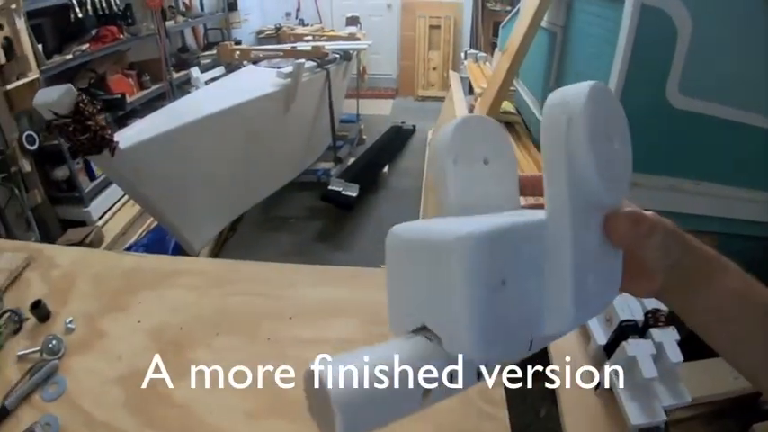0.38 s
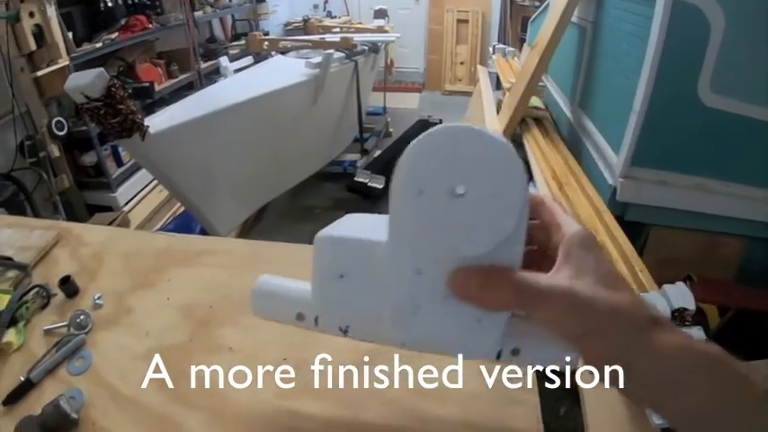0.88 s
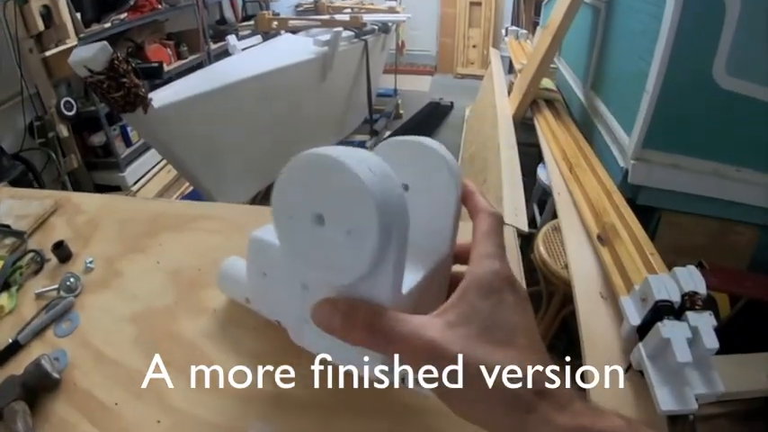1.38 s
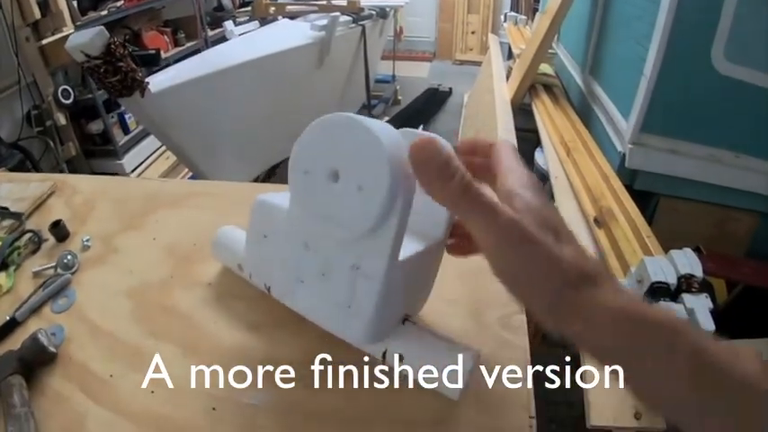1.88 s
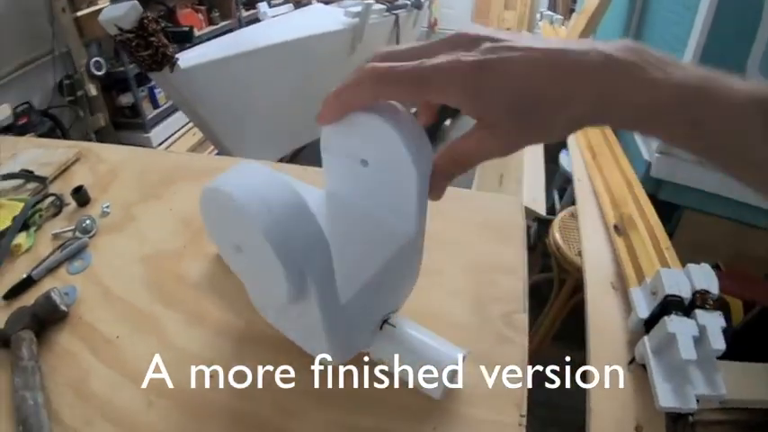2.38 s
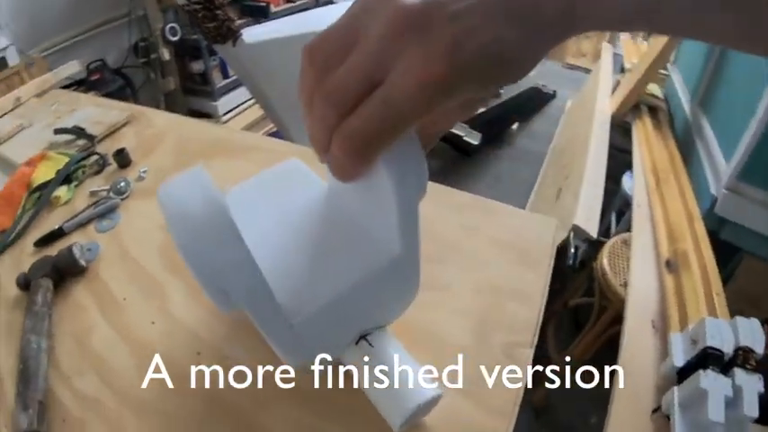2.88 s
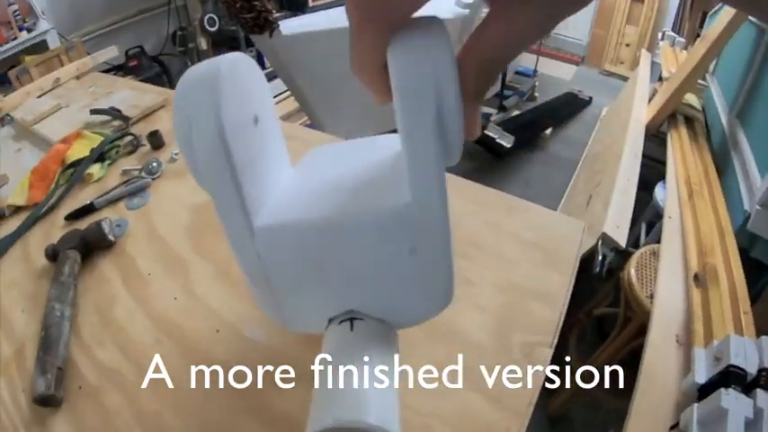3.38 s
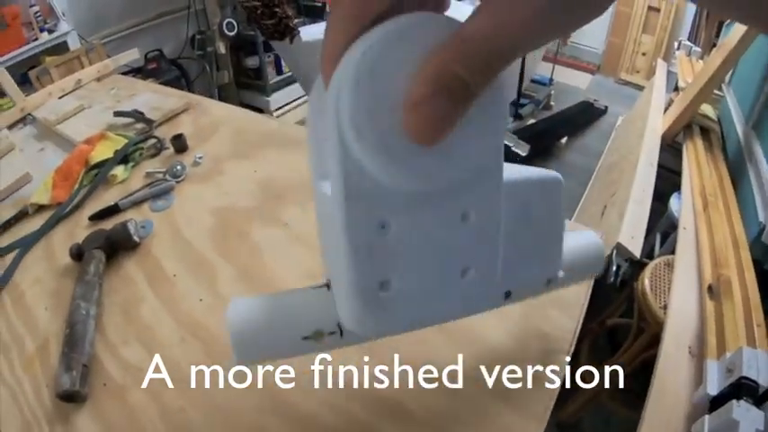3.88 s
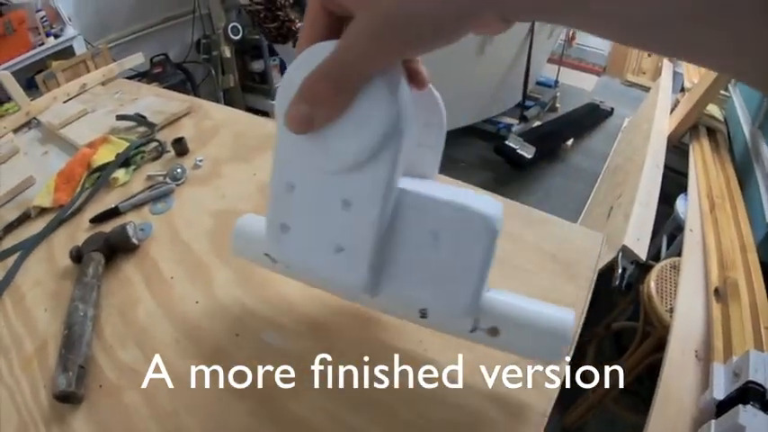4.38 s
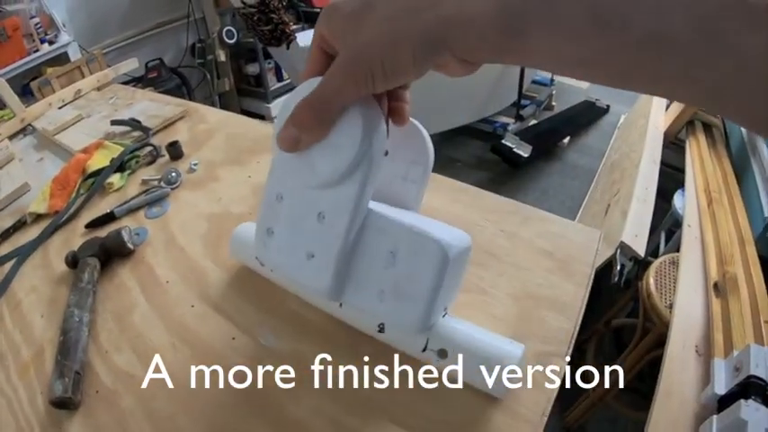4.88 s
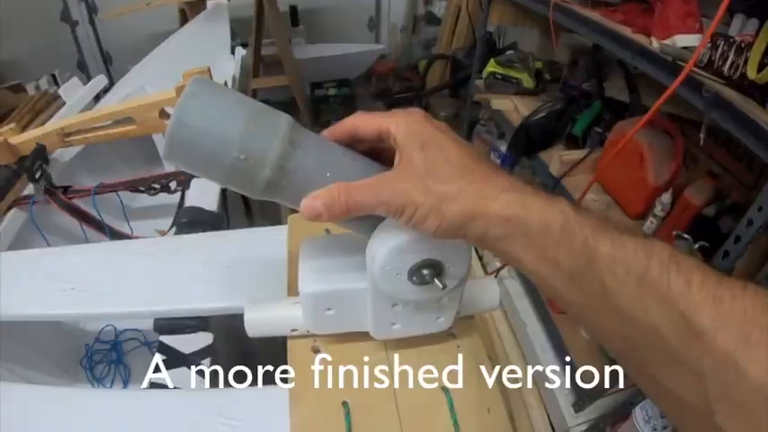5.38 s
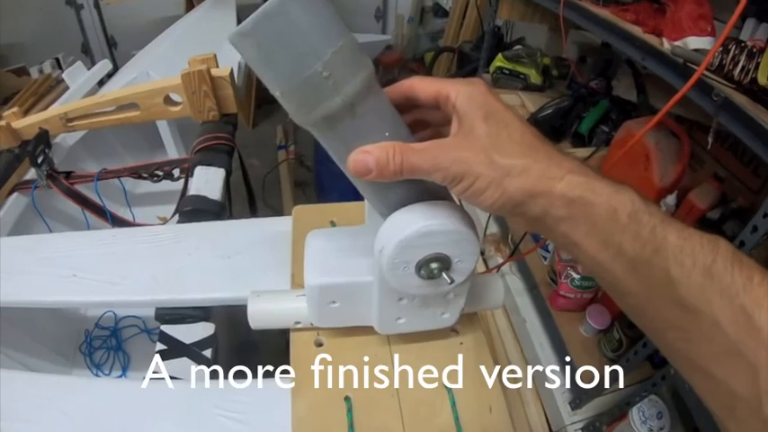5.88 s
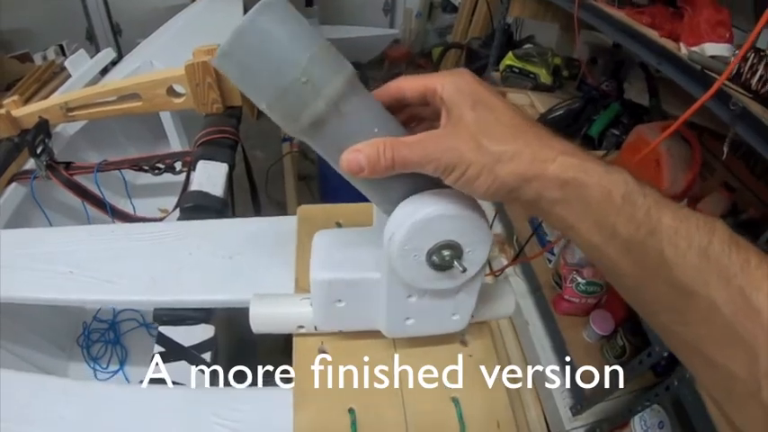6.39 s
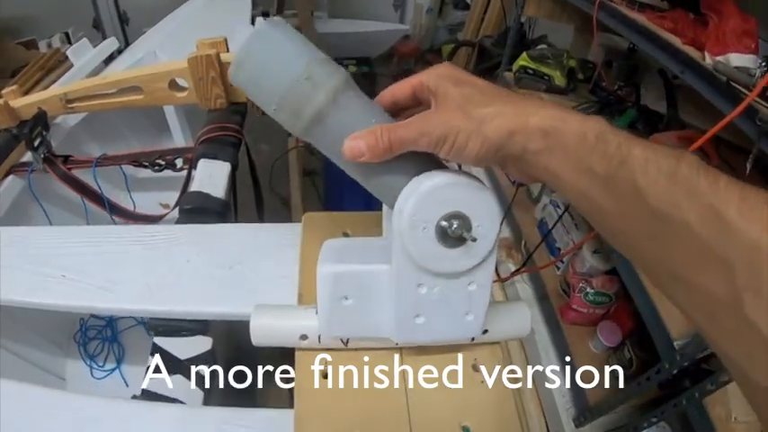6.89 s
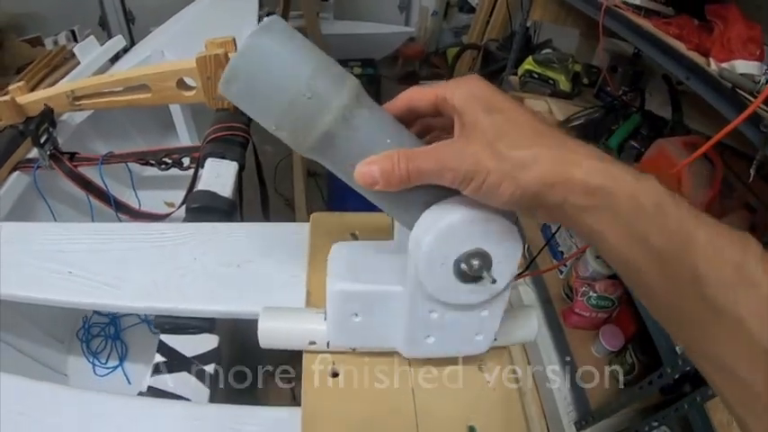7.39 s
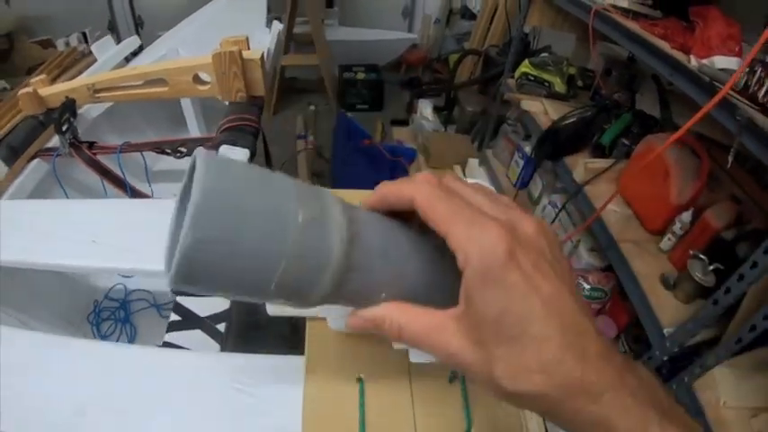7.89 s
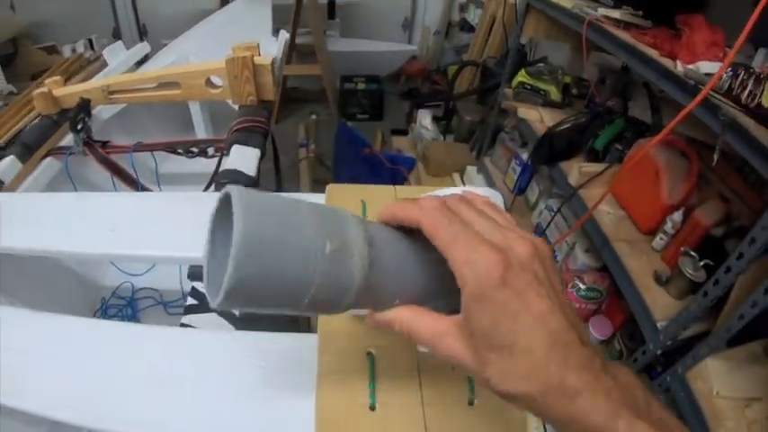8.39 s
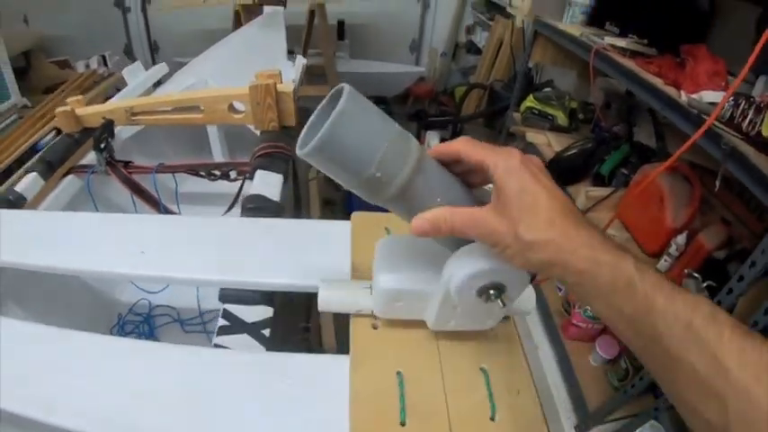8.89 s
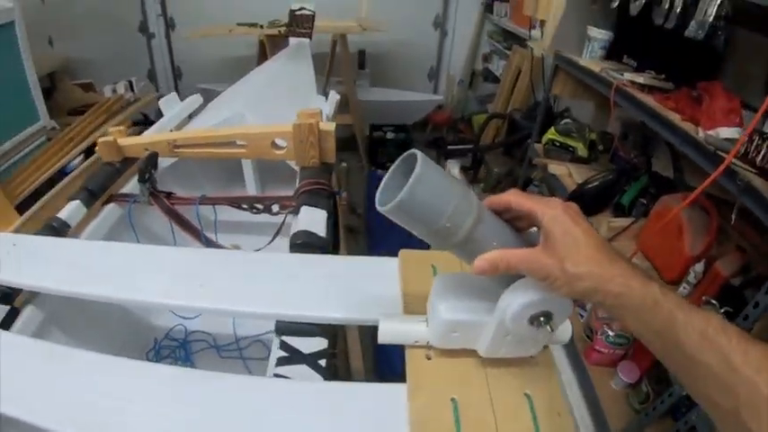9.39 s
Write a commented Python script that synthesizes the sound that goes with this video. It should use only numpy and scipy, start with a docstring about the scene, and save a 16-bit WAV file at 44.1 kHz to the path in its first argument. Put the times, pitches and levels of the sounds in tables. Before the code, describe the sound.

A hollow plastic bracket thuds onto plywood amid dry finger rubbing, then a plastic pipe knocks, creaks and scrapes on its pivot over faint garage hum.

```python
"""Lamps hum in a garage over low rumble while fingers rub a hollow plastic bracket and set it down on plywood.
After a fade at 5.2 s a plastic pipe swings on its pivot, knocking, creaking and scraping, with low thumps;
its first swings are heard in mono, then the stereo image widens steadily until a last short fade.
Blows and rubbing excite banks of damped modes; hum is a sum of sines; air, rumble and hiss are filtered noise.
Levels in the tables precede the common 6 dB reduction in record()."""
import sys
import numpy as np
from scipy import signal
from scipy.fft import rfft, irfft
from scipy.io import wavfile

SR = 44100
rng = np.random.default_rng(int(sys.argv[2]) if len(sys.argv) > 2 else 0)


def unload_audio(sound):
    """Save the sound as a 16-bit wav file, at the path given as the first command line argument."""
    columns = np.transpose(np.atleast_2d(sound))
    # keep every value between -1 and 1, then stretch to whole-number steps
    steps = np.round(np.clip(columns, -1, 1) * 32767)
    wavfile.write(sys.argv[1], SR, steps.astype(np.int16))


def nominal_scale(level):
    """Amplitude ratio for a level in decibels (scalar or array-like)."""
    x = np.asarray(level, float) / 20
    return 10 ** x


N = 419832
TIME = np.arange(N) / SR
OPPOSITE = np.array([[1], [-1]])   # signs of a side signal in the left and right ports

# Bracket meets bench. Each row: start in seconds, levels of thud, clack and snap in dB,
# best-struck pitch in Hz.
BRACKET_LANDINGS = [(1.294, -24.5, -36.5, -57, 260), (1.314, -29, -65, -74, 263),
                    (1.331, -31, -53.5, -64, 250), (1.456, -45, -63, -74, 237),
                    (1.603, -17.5, -33, -79, 334), (1.611, -30, -42.5, -70, 340),
                    (1.634, -33, -46, -59, 210), (1.797, -51, -62, -50, 256), (2.079, -46, -74, -59, 194),
                    (2.431, -43.5, -72, -52, 278), (2.534, -48.5, -82, -47, 257),
                    (2.584, -55, -69, -57, 232), (2.654, -54, -90, -70, 270), (2.845, -54.5, -76, -62, 310),
                    (3.43, -30.5, -47, -37, 200), (3.458, -50, -44.5, -36, 292),
                    (3.473, -35.5, -80, -53, 238), (4.671, -22.5, -36, -38.5, 295),
                    (4.685, -30.5, -60, -56, 300), (4.707, -32.5, -55, -58, 246),
                    (4.743, -49, -59, -48, 158), (4.767, -32.5, -56.5, -52, 164.5),
                    (4.844, -37, -72, -65, 167), (4.933, -59.5, -61, -68, 156), (5.043, -67, -86, -67, 249)]
# Modes of the plywood top. Each row: frequency in Hz, level in dB, relative ring time.
PLYWOOD_MODES = [(63.7, 1.5, 0.42), (95, 5.5, 0.34), (147.9, -4, 1), (178, -1.5, 0.93), (200.15, 1, 0.88),
                 (230.3, -15, 0.87), (254, 0.5, 0.52), (278, -16.5, 0.36), (309.7, -1, 0.7),
                 (336.6, -12.5, 0.47), (368, -11.5, 0.36), (390, -6, 0.37), (416, -17, 0.23),
                 (452.6, -13, 0.41)]
# Resonances of the shell under the fingers. Each row: frequency in Hz, width in Hz, level in dB.
RUBBED_SHELL_MODES = [(756, 120, 11.5), (1400, 97, 8), (2093, 65, 0), (2800, 270, -12), (3726, 32, -19.5),
                      (4090, 62, -11), (5160, 150, -11.5), (5750, 150, -11.5), (6230, 500, -2.5)]
# Pipe strikes pivot and bracket. Each row: start in seconds, level in dB,
# hardness (0 hollow, 1 middle, 2 clack, 3 bright).
PIPE_KNOCKS = [(5.35, -68, .02), (5.395, -42, 0.049), (5.41, -53, 0.25), (5.435, -59.5, 1.45),
               (5.437, -36.5, 0.24), (5.446, -43.5, 0.022), (5.476, -49.5, 0.061), (5.573, -40.5, 0.29),
               (5.603, -63, 0.98), (5.621, -44.5, .02), (5.646, -42.5, 1.6), (5.652, -43, 1.7),
               (5.657, -31, 1.18), (5.661, -36.5, 1.43), (5.669, -32.5, 1.3), (5.686, -48, 1.5),
               (5.733, -53, 1.97), (5.78, -46.5, .02), (5.794, -50.5, 0.3), (5.855, -36.5, 0.017),
               (5.9, -65, 0.038), (5.929, -47.5, 0.052), (5.969, -60, 0.6), (6.003, -54, 0.26),
               (6.173, -47.5, 1.52), (6.183, -49, 2.5), (6.229, -52.5, 1.45), (6.26, -49.5, 0.015),
               (6.285, -58.5, 0.015), (6.302, -70, 0.15), (6.33, -63.5, .02), (6.389, -58, .1),
               (6.413, -60, 0.03), (6.44, -61, .02), (6.462, -59.5, .05), (6.478, -59, 0.86),
               (6.498, -61, 0.36), (6.569, -59, .9), (6.598, -53, 0.98), (6.608, -58, 0.62),
               (6.634, -56, 0.95), (7.643, -40, 0.24), (7.675, -39.5, 0.12), (7.685, -45, 0.12),
               (7.694, -36, 0.25), (7.704, -53, 0.12), (7.734, -54, 0.64), (7.788, -57, 0.022),
               (7.926, -30.5, 1.27), (7.926, -37, 2.4), (7.951, -27, 1.3), (7.952, -16.5, 2.59),
               (7.957, -29, 1.36), (7.958, -20, 2.49), (7.97, -31, 2.2), (7.982, -46, 3),
               (7.999, -23, 2.38), (8.001, -32.5, 1.17), (8.012, -41, 2.14), (8.014, -38, 1.23),
               (8.019, -40.5, 1.7), (8.807, -54, 0.02), (8.814, -52, 1.05), (8.82, -65, .03),
               (8.84, -57, 0.9), (8.913, -67, 0.93)]
# Correlation of the ports. Each row: frequency in Hz, likeness (1 equal, -1 opposite).
PORT_LIKENESS = [(60, -0.18), (220, 1), (450, 0.35), (1200, -0.41), (3000, -0.064)]
# Fades between passages. Each row: silent moment in seconds, fade-out and fade-in in seconds.
FADES = [(5.179, 0.13, 0.14), (9.482, 0.095, 0.036)]


def rms_one(x):
    """Normalization: scale a signal to unit rms."""
    return x / np.sqrt(np.mean(x ** 2) + 1e-20)


def in_time(rows, outside=None):
    """Linear interpolation: the columns of a time curve, sample by sample."""
    s, *columns = np.transpose(rows)
    return [np.interp(TIME, s, c, outside, outside) for c in columns]


def at_hz(points, hz):
    """Logarithmic pitch: a spectrum table is read linearly in the logarithm of frequency."""
    table_hz, value = np.array(points)[:, 0], np.array(points)[:, 1]
    return np.interp(np.log(hz), np.log(table_hz), value)


def cut(x, hz, kind, order=2):
    """Band limitation: a maximally flat (Butterworth) filter."""
    return signal.sosfilt(signal.butter(order, hz, kind, fs=SR, output="sos"), x)


def drift(rate):
    """Slow random modulation: noise through two equal poles at rate (Hz), with unit rms."""
    r = np.exp(-80 * np.pi * rate / SR)   # computed at every 40th sample
    noise = rng.standard_normal(N // 40 + 2002)
    slow = signal.lfilter([1], [1, -2 * r, r * r], noise)[2000:]
    return np.interp(np.arange(N) / 40, np.arange(len(slow)), rms_one(slow))


def ring(clicks, hz, t60):
    """Damped resonance: a unit click starts a decaying sine of height 1; t60 in seconds."""
    r, w = nominal_scale(-60 / (t60 * SR)), 2 * np.pi * hz / SR
    return signal.lfilter([0, np.sin(w)], [1, -2 * r * np.cos(w), r * r], clicks + 1e-18)


def strike(seconds, blow_db, modes, scatter_db, crunch_s, sharpness=2.1):
    """Modal excitation: a short crunch of contacts feeds each mode (Hz, dB, t60 s) near its own pitch."""
    at, n = np.round(seconds * SR).astype(int), np.arange(600)
    out = np.zeros(N)
    luck = scatter_db * rng.standard_normal((len(at), len(modes)))
    crunch = rng.standard_normal((len(at), len(n))) * nominal_scale(-60 * n / (crunch_s * SR))
    crunch *= 1 - np.exp(-6 * (n + 1) / (crunch_s * SR))   # the contact area grows first
    crunch[:, 0] = abs(crunch[:, 0])   # the first contact always pushes the same way
    crunch /= np.sqrt(np.sum(crunch ** 2, axis=1, keepdims=True))
    for k, (hz, level_db, t60) in enumerate(modes):
        at_pitch = abs(crunch @ np.exp(-2j * np.pi * hz * n / SR))   # spectrum of the crunch at this mode
        drive = np.maximum(at_pitch, 0.55)
        r = np.exp(-np.pi * hz / (sharpness * SR))   # sharpness is the Q of the feeding band
        poles = [1, -2 * r * np.cos(2 * np.pi * hz / SR), r * r]
        near = signal.lfilter([(1 - r * r) / 2, 0, (r * r - 1) / 2], poles, crunch)
        strength = nominal_scale(blow_db + level_db + luck[:, k]) / drive
        push = np.zeros(N)
        np.add.at(push, at[:, None] + n, strength[:, None] * near)
        out += ring(push, hz, t60)
    return out


def grains(per_s, spread_db):
    """Stick-slip as a random impulse train: clicks of uneven size and either sign, with unit rms."""
    sizes = nominal_scale(spread_db * np.minimum(rng.exponential(1, N), 4)) * rng.choice([-1, 1], N)
    return rms_one(sizes * (rng.random(N) < per_s / SR))


def coloured(x, spectrum):
    """Linear filtering in the frequency domain: a spectrum table shapes a noise to unit rms."""
    hz = np.fft.rfftfreq(N, 1 / SR) + 1
    return rms_one(irfft(rfft(x) * nominal_scale(at_hz(spectrum, hz)), N))


def puff(seconds, blow_db, t60):
    """Dense modal decay as noise: a burst dies exponentially after every blow."""
    clicks = np.zeros(N)
    clicks[np.round(seconds * SR).astype(int)] = nominal_scale(blow_db)
    envelope = signal.lfilter([1], [1, -nominal_scale(-60 / (t60 * SR))], clicks + 1e-18)
    return envelope * rng.standard_normal(N)


def swells(start, length, rise_db, fall_db, arch_db, *weights_db):
    """Envelopes: each row rises, arches and dies (slopes in dB/s); one sum per set of levels."""
    t = np.arange(0, N + 32, 32) / SR
    late = t - start[:, None]
    after_end = late - length[:, None]
    within = np.clip(2 * late / length[:, None] - 1, -1, 1)
    slopes_db = rise_db * np.minimum(late, 0) - fall_db * np.maximum(after_end, 0)
    shape = nominal_scale(slopes_db - arch_db * within ** 2)
    return [np.interp(TIME, t, nominal_scale(db) @ shape) for db in weights_db]


def likeness_at(hz):
    """Correlation of two receivers: likeness of the ports at a frequency, kept short of its extremes."""
    return np.clip(at_hz(PORT_LIKENESS, hz), -.95, .95)


def room_air():
    """Partly correlated noise: half-octave bands of room air share a mid and differ by a side signal."""
    # Spectrum of the air. Each row: frequency in Hz, level in dB per Hz.
    air_spectrum = [(110, -12.5), (170, 3), (240, 0.5), (330, -17), (500, -17), (850, -16), (1300, -27),
                    (2000, -27), (3500, -38), (6000, -39.5), (9000, -57.5)]
    out = np.zeros((2, N))
    white = rng.standard_normal((2, 2, N))
    edges = 110 * 2 ** np.arange(0, 7, .5)
    for k, (low, high) in enumerate(zip(edges, edges[1:])):
        mid, side = cut(white[k % 2], [low, high], "band")
        centre = np.sqrt(low * high)
        alike = likeness_at(centre)
        gain = nominal_scale(at_hz(air_spectrum, centre) + 1.0 * drift(11))
        out += gain * (mid + np.sqrt((1 - alike) / (1 + alike)) * side * OPPOSITE)
    return out * nominal_scale(-73.5) / np.std(out.mean(axis=0))


def lamp_hum():
    """Harmonic series: lamps sound wavering multiples of the mains, out of phase between the ports."""
    # Each row: multiple of the mains, level in dB before and after the first fade.
    hum_lines = [(3, -84, -85), (4, -70, -74), (5, -91, -85), (6, -80, -83), (7, -100, -89.5),
                 (8, -83.5, -84), (10, -86.5, -90), (12, -92.5, -86.5), (14, -87, -88), (16, -89, -100),
                 (18, -101, -104), (20, -99, -104), (22, -104, -95.5), (24, -99, -106), (28, -99, -103),
                 (30, -106, -97)]
    mains_hz = 59.95
    out = np.zeros((2, N))
    for multiple, first_db, second_db in hum_lines:
        hz = np.round(multiple) * mains_hz
        db = np.where(TIME < FADES[0][0], first_db, second_db)
        turn = 2 * np.pi * (hz * TIME + rng.random())
        lag = np.arccos(likeness_at(hz)) / 2 * OPPOSITE
        # dividing by cos(lag) keeps the level of the mid signal
        out += np.sqrt(2) * nominal_scale(db + 1.3 * drift(17.0)) * np.sin(turn + lag) / np.cos(lag)
    return out


def background():
    """Superposition: room air and lamp hum follow one level curve."""
    # Each row: time in seconds, level in dB.
    level_curve = [(0, 5.5), (5.1, 4), (5.3, 4), (7.5, 7.5), (8.1, 2.5), (8.42, -1.5), (8.55, 4), (9.52, 1)]
    return nominal_scale(in_time(level_curve)[0]) * (room_air() + lamp_hum())


def rumble():
    """Low-frequency noise, partly its own in each port, swells at times and after each bench thud."""
    # Each row: start in seconds, length in seconds, level in dB.
    surges = [(0.212, 0.21, -60.5), (0.7, 0.2, -61), (1.056, 0.025, -61), (2.834, 0.051, -56),
              (4.373, 0.1, -58), (5.225, 0.022, -43.5), (5.31, 0.72, -50.5), (6.1, 0.15, -57),
              (6.424, 0.12, -54.5), (6.67, 0.031, -48.5), (7.055, 0.13, -52), (7.273, 0.62, -54),
              (8.152, 0.042, -66.5), (8.524, 0.42, -61.5), (9.033, 0.24, -64.5)]
    # a thud shakes the microphones for 17 ms, 25 dB below its own level
    shakes = [(s, 0.017, thud_db - 25) for s, thud_db, *_ in BRACKET_LANDINGS]
    s, length, db = np.transpose(surges + shakes)
    level = nominal_scale(-78) + swells(s, length, 255.5, 151.5, 7.5, db)[0]   # steady floor at -78 dB

    def lumpy_noise():
        """Amplitude modulation: slow chance makes the low band uneven."""
        low = cut(cut(rng.standard_normal(N), 38, "low"), 23, "high")
        return rms_one(low * nominal_scale(2.8 * drift(9)))

    mid, side = lumpy_noise(), lumpy_noise()
    return level * (mid + nominal_scale(-9.0) * side * OPPOSITE)


def fingertip_landings():
    """Modal selection: each fingertip excites the shell most near its best-struck pitch."""
    # Each row: start in seconds, level in dB, best-struck pitch in Hz.
    landings = [(0.4973, -59.5, 2250), (0.5191, -57, 2120), (1.8781, -48, 6100), (1.8991, -64, 2600),
                (1.9614, -53, 764), (2.0294, -61, 2200), (2.389, -67, 1500), (2.5296, -50.5, 1440),
                (2.588, -55.5, 1400), (3.098, -57.5, 755), (3.2994, -67, 1480)]
    loss_db_per_octave2 = 20
    s, nail_db, best_hz = np.transpose(landings)
    out = np.zeros(N)
    for hz, wide, db in RUBBED_SHELL_MODES:
        loss_db = loss_db_per_octave2 * np.log2(hz / best_hz) ** 2
        out += strike(s, nail_db - loss_db, [(hz, db, 1.44 / wide)], scatter_db=6.0, crunch_s=0.0024)
    return out


def rub():
    """Stick-slip friction: skin slips in dense grains that excite the shell and press on the board."""
    # Each row: start in seconds, length in seconds, rub level in dB, brightness in dB,
    # shell ring in dB relative to the skin hiss.
    strokes = [(0.512, 0.026, -99.5, 0.5, 30), (0.916, 0.033, -85, -8.5, 16),
               (1.006, 0.021, -76.5, -1.5, 0), (1.068, 0.16, -80, -3, 0), (1.26, 0.18, -76.5, -21, 8),
               (1.432, 0.11, -70, -12, 7.5), (1.617, 0.26, -67, -8, 1.5), (1.881, 0.091, -59.5, -6.5, 2),
               (1.996, 0.083, -58.5, -12.5, 2.5), (2.061, 0.27, -72.5, -4.5, 0.5),
               (2.369, 0.063, -61, -8, 1.5), (2.426, 0.08, -66, -14.5, -0.5), (2.528, 0.034, -68, -4, -0.5),
               (2.562, 0.057, -68, -9, -3), (2.607, 0.062, -60.5, -4.5, 0), (2.68, 0.24, -77.5, -11, 0.5),
               (2.914, 0.25, -61.5, -0.5, -9), (3.177, 0.079, -72, -0.5, 4), (3.294, 0.013, -78, 0, 0),
               (3.428, 0.0085, -75, -30, 20), (3.46, 0.02, -52, -26, -13), (3.727, 0.092, -77.5, -16, -1),
               (4.662, 0.085, -70, -17, -11), (4.756, 0.016, -58.5, -23, -5),
               (4.935, 0.029, -68, -14, -1.5), (5.055, 0.014, -84, -9, 2)]
    # Skin hiss. Each row: frequency in Hz, level in dB per Hz.
    skin_spectrum = [(500, -12), (900, -7.5), (1500, 11.5), (2800, 5), (5000, -11), (7500, -8),
                     (10000, -14), (13000, -18), (15500, -28)]
    press_db = 1   # board relative to the shell ring
    s, length, rub_db, bright_db, ring_db = np.transpose(strokes)
    dull, bright, dull_ring, bright_ring = swells(
        s, length, 610.5, 256, 13,
        rub_db, rub_db + bright_db, rub_db + ring_db, rub_db + ring_db + bright_db)
    slip = grains(3500, spread_db=2.5) * nominal_scale(2.73 * drift(30))
    shell = np.zeros(N)
    for hz, wide, db in RUBBED_SHELL_MODES:   # each peak wavers in level by its own slow chance
        shell += nominal_scale(db + 4.5 * drift(12)) * rms_one(ring(slip, hz, 2.2 / wide))
    both = np.array([coloured(slip, skin_spectrum), rms_one(shell)])
    low = cut(both, 4500, "low", order=4)
    high = cut(both, 4500, "high", order=4)
    treble = (bright * high[0] + bright_ring * high[1]) / np.std(high[0])
    skin = dull * low[0] + dull_ring * low[1] + treble
    board = rms_one(sum(nominal_scale(db) * ring(slip, hz, 1.1 * share) for hz, db, share in PLYWOOD_MODES))
    return skin + nominal_scale(press_db) * dull_ring * board


def garage(x, wet_db, side_db, side_hz, build_s):
    """Reverberation: convolution with octave bands of dying noise; the bass is alike at both ports."""
    # Each row: frequency in Hz, reverberation time in seconds.
    reverberation = [(150, 0.46), (500, 0.48), (1500, 0.35), (4000, 0.35), (10000, 0.26)]
    t, echo = np.arange(SR // 2) / SR, 0
    for hz in 125 * 2. ** np.arange(7):
        noise = cut(rng.standard_normal((2, len(t))), [hz / 1.414, hz * 1.414], "band")
        decay = nominal_scale(-60 * t / at_hz(reverberation, hz))
        echo = echo + noise * decay * np.clip(t / build_s, 0, 1)
    echo = echo / np.sqrt(np.sum(echo[0] ** 2))
    mid, side = signal.fftconvolve(x[None], echo, axes=1)[:, :N]
    return nominal_scale(wet_db) * (mid + nominal_scale(side_db) * cut(side, side_hz, "high", order=3) * OPPOSITE)


def thuds():
    """Damped plate modes: the spot struck favours modes near one pitch, the holding hand damps them."""
    held_t60_s = 0.28      # times the relative ring time of each mode
    soft_narrowing = 0.21  # softer landings keep closer to pitch: dB per octave squared, per dB of level
    out, t = np.zeros(N + SR), np.arange(SR // 2)[:, None] / SR
    hz, level_db, ring_time = np.transpose(PLYWOOD_MODES)
    luck = rng.standard_normal((len(BRACKET_LANDINGS), 2, len(PLYWOOD_MODES)))
    for (s, thud_db, _, _, best_hz), (tune, phase) in zip(BRACKET_LANDINGS, luck):
        off_pitch_db = soft_narrowing * thud_db * np.log2(hz / best_hz) ** 2
        gain = nominal_scale(thud_db + level_db + off_pitch_db - 60 * t / (held_t60_s * ring_time))
        soft_start = 1 - np.exp(-t / 0.0049)
        mode_hz = hz * (1 + 0.008 * tune)
        swing = gain * soft_start * np.cos(2 * np.pi * mode_hz * (t - .007) + .5 * phase)
        out[round(s * SR):][:len(t)] += swing.sum(axis=1)
    return out[:N]


def set_downs():
    """Impact of two bodies: the board thuds, the shell clacks over a woody wash, the contact snaps."""
    # Modes of the bracket shell. Each row: frequency in Hz, level in dB, t60 in seconds.
    shell_modes = [(532.5, 3, 0.1), (680.5, 2, 0.081), (698, 1, 0.077), (772, 1, 0.062), (964, 0.5, 0.056),
                   (1017, -6.5, 0.048), (1340, -15, 0.027), (1520, -14, 0.016)]
    s, thud_db, clack_db, snap_db = np.transpose(BRACKET_LANDINGS)[:4]
    s = s + 0.00205   # the edge lands just after the board starts to give
    clack = cut(strike(s, clack_db, shell_modes, scatter_db=3.0, crunch_s=0.007), 1500, "low")
    wash = cut(puff(s, clack_db + 10.0, t60=0.18), [420, 1100], "band")
    snap = cut(cut(puff(s, snap_db, t60=0.039), 1300, "high"), 2920, "low")
    body = cut(puff(s, thud_db - 11, t60=0.23), [170, 430], "band")
    return thuds() + body + clack + wash + snap


def ticks():
    """Transients as band-limited noise: each dry tick is a brief, exponentially dying burst."""
    # Each row: start in seconds, level in dB, lowest pitch in Hz.
    bursts = [(1.897, -45, 1200), (1.962, -51, 2500), (2.033, -47, 2500), (4.947, -60, 2500),
              (5.574, -67, 2000), (5.603, -60, 2200), (5.647, -40, 3500), (5.658, -37.5, 4480),
              (5.672, -48, 4470), (6.175, -58, 3800), (6.231, -59, 3800), (6.005, -62, 1500),
              (6.301, -54, 5070), (6.39, -69, 1500), (6.878, -64, 3000), (6.897, -68, 2500),
              (6.935, -65, 1500), (7.054, -69, 1500), (7.072, -60, 1500), (7.238, -63, 1500),
              (7.276, -67, 1790), (7.385, -67, 2000), (8.816, -54, 1300)]
    width_octaves = 1.3
    out, n = np.zeros(N), np.arange(2000)
    for (s, db, low_hz), noise in zip(bursts, rng.standard_normal((len(bursts), len(n)))):
        dying = noise * nominal_scale(db - 60 * n / (0.04 * SR))
        band = [low_hz, low_hz * 2 ** width_octaves]
        out[round(s * SR):][:len(n)] += cut(dying, band, "band", order=3)
    return cut(out + 1e-18, 6200, "low", order=4)


def pipe():
    """Contact stiffness: knocks and drag excite the same four mode families, harder contact the higher."""
    # Four families of pipe modes. Each row: frequency in Hz, level in dB, t60 in seconds.
    hollow = [(307, -9, 0.027), (438.5, 2.5, 0.074), (586.6, 9.5, 0.043), (689.3, 3, 0.039),
              (805, -1.5, 0.041)]
    middle = [(965, -4, 0.024), (1353, 6, 0.019), (1540, 4, 0.02), (1690, -1.5, 0.029), (2305, -8, 0.028)]
    clack = [(2600, -1.5, 0.008), (2840, 3.5, .008), (3100, 1, 0.017), (3245, 3, 0.014), (3500, 0.5, 0.007)]
    bright = [(3550, -1.5, .006), (4005, -1, 0.007), (3965, 0.5, 0.007), (4226, 7, 0.0095),
              (4607, 5.5, 0.005), (5100, -9.5, 0.0055), (5635, 1, 0.0096), (6500, -17.5, 0.0039)]
    # Pipe drags on its pivot. Each row: time in seconds, level in dB, hardness.
    drag_curve = [(5.2, -92, 0.29), (5.4, -74, 1.1), (5.52, -75, 0.034), (5.6, -78.5, .8), (5.64, -58, 2.7),
                  (5.72, -56, 1.6), (5.77, -57.5, 0.27), (5.85, -59, 0.062), (5.98, -68, 0.027),
                  (6.44, -71, 0.033), (6.53, -74, 0.31), (6.61, -63, 0.62), (6.68, -74, 0.23),
                  (7.3, -73.5, 0.42), (7.45, -81, 0.18), (7.7, -77, 0.57), (7.81, -64.5, .05),
                  (7.85, -74.5, 0.51), (7.92, -60, 1.8), (7.95, -77.5, 0.62), (8.16, -66.5, 0.625),
                  (8.27, -87, 0.17), (8.52, -68.5, 0.37), (8.7, -78.5, 0.49), (9.4, -76.5, 0.39)]
    above_db, below_db, drag_step_db = 16.5, 23.5, 11   # loss per step from the contact's hardness
    s, peak_db, hard = np.transpose(PIPE_KNOCKS)
    out = np.zeros(N)
    scratch = grains(2000, spread_db=3.5) * nominal_scale(3.5 * drift(30))
    drag_db, drag_hard = in_time(drag_curve, -120)
    families = zip((hollow, middle, clack, bright), (0.011, .012, .005, 0.0016))
    for k, (modes, crunch_s) in enumerate(families):
        loss_db = np.maximum(above_db * (k - hard), below_db * (hard - k))
        family = strike(s, peak_db - loss_db, modes, scatter_db=4.0, crunch_s=crunch_s)
        scrape = rms_one(sum(nominal_scale(level) * ring(scratch, hz, 0.3 * t60) for hz, level, t60 in modes))
        family += nominal_scale(drag_db - drag_step_db * abs(drag_hard - k)) * scrape
        # soft plastic leaves no click beyond its modes
        out += cut(family, [0.75 * modes[0][0], 1.17 * modes[-1][0]], "band", order=3)
    return out


def thumps():
    """Structure-borne sound: blows carried to the microphones excite three short low modes."""
    # Each row: start in seconds, level in dB.
    carried_blows = [(5.241, -38), (5.351, -61), (5.408, -35.5), (5.448, -42), (5.472, -38.5), (5.529, -44),
                     (5.574, -53), (5.604, -42.5), (5.622, -29), (5.657, -51), (5.78, -54), (5.794, -45),
                     (5.852, -49.5), (5.93, -48), (6.003, -56), (6.304, -52.5), (6.415, -60),
                     (6.476, -54.5), (6.499, -56), (6.675, -69), (7.531, -55), (7.648, -54), (7.675, -47),
                     (7.701, -50), (7.713, -39), (7.734, -45), (7.797, -45.5), (7.823, -50), (7.866, -51),
                     (8.815, -51), (8.846, -61)]
    modes = [(65.4, 6.2, 0.038), (123.5, 8.6, 0.032), (197.3, 1.9, 0.042)]   # Hz, dB, t60 s
    thump = strike(*np.transpose(carried_blows), modes, scatter_db=3.5, crunch_s=.0001, sharpness=0.59)
    return cut(thump, 410, "low", order=3)


def hiss():
    """Band-limited noise: a faint smooth hiss with a sharp upper edge near 4.8 kHz after the first fade."""
    # Each row: time in seconds, level in dB.
    hiss_curve = [(5.3, -100), (5.7, -80), (6.3, -89), (7.5, -91.5), (8.3, -100), (8.6, -88), (9.4, -93.5)]
    band = cut(cut(rng.standard_normal(N), 1500, "high"), 4800, "low", order=10)
    return nominal_scale(in_time(hiss_curve, -120)[0]) * rms_one(band)


def creaks():
    """Stick-slip under load: uneven slips ring the narrow resonances of the pivot."""
    # Each row: start in seconds, length in seconds, level in dB.
    loaded_spells = [(5.562, .03, -66), (5.68, .1, -66), (7.7, .05, -66), (7.845, 0.08, -60),
                     (7.88, 0.09, -53), (7.93, 0.05, -50), (8.008, 0.2, -63), (8.838, .018, -64),
                     (8.9, .025, -70), (6.465, 0.045, -62), (6.53, .025, -65), (6.568, .012, -57),
                     (6.59, .028, -56.5), (6.63, .014, -57), (6.67, .1, -71)]
    # Each row: frequency in Hz, level in dB, t60 in seconds.
    pivot_modes = [(1300, -28.5, .015), (1450, -27, .03), (1675, -30.5, .02), (2090, -32, .01),
                   (2484, -38, 0.029), (912, -24, 0.0075)]
    s, length, db = np.transpose(loaded_spells)
    slips = cut(grains(3500, spread_db=6.0), [800, 2700], "band")
    slips = slips * swells(s, length, 300, 400, 3.0, db)[0]
    return sum(nominal_scale(level) * ring(slips, hz, t60) for hz, level, t60 in pivot_modes)


def taps():
    """Two damped modes: short dull taps near the left port, weaker and opposite in sign at the right."""
    # Each row: start in seconds, level in dB.
    left_taps = [(7.7, -33), (7.801, -38.5), (8.757, -41), (9.036, -37), (9.262, -49), (9.368, -37.5)]
    modes = [(345, 0, 0.012), (745, -7.5, 0.014)]   # Hz, dB, t60 s
    tap = strike(*np.transpose(left_taps), modes, scatter_db=1, crunch_s=.0001)
    return cut(tap, 1500, "low", order=3) * (1 + nominal_scale(5.5) * OPPOSITE)


def bolt_and_washer():
    """Lightly damped metal: the pivot bolt rings with a wavering level and a washer pings once."""
    # Each row: start in seconds, level in dB.
    bolt_hits = [(7.936, -62.5), (7.962, -56.5), (7.99, -55)]
    # One mode: frequency in Hz, level in dB, t60 in seconds.
    bolt_mode = (7332, 0, 0.26)
    # First row: start in seconds, level in dB. Second row: frequency in Hz, level in dB, t60 in seconds.
    washer_ping = [(7.75, -62), (6030, 0, .08)]
    bolt = strike(*np.transpose(bolt_hits), [bolt_mode], scatter_db=2.5, crunch_s=0.0069)
    washer = strike(*np.transpose(washer_ping[:1]), washer_ping[1:], scatter_db=0, crunch_s=.0001)
    return bolt * nominal_scale(2.5 * drift(25)) + washer


def washer_rattle():
    """Secondary impacts: from 7.9 s the pipe knocks also shake loose washers, most at hardness 2.5."""
    # Each row: frequency in Hz, level in dB, t60 in seconds.
    washer_modes = [(8500, -20, 0.0057), (9400, -22, .004), (10000, -28.5, .003), (11500, -33.5, .003)]
    s, peak_db, hard = np.transpose(PIPE_KNOCKS)
    free = s > 7.9
    level_db = peak_db - 6.5 * abs(2.5 - hard)
    return strike(s[free], level_db[free], washer_modes, scatter_db=7, crunch_s=0.004)


def scene():
    """Superposition of direct and reverberant sound: bench, hands and pipe over hum and rumble."""
    bench = set_downs() + rub() + fingertip_landings()
    plastic = pipe() + creaks()
    rattle = washer_rattle()
    metal = bolt_and_washer() + rattle
    mix = bench + garage(bench, wet_db=-10.5, side_db=1.0, side_hz=537, build_s=0.0031)
    mix = mix + plastic + garage(plastic, wet_db=-16.0, side_db=3.0, side_hz=300, build_s=0.03)
    mix = mix + garage(rattle, wet_db=-3.5, side_db=6.5, side_hz=3000, build_s=0.004)
    mix = mix + metal * (1 + .9 * OPPOSITE)   # the metal leans to the left port
    return mix + thumps() + taps() + ticks() + hiss() + background() + rumble()


def band_limit(x):
    """A steep low-pass at the top of the band."""
    return signal.sosfilt(signal.butter(12, 15700, fs=SR, output="sos"), x)


def record(dry):
    """Mid-side stereo: the side is shut off and widened again, under fades and over a faint hiss."""
    gain = nominal_scale(-6)
    for s, out_s, in_s in FADES:
        fade = np.clip(np.maximum((s - TIME) / out_s, (TIME - s) / in_s), 0, 1)
        gain = gain * fade ** 0.94
    after_fade = TIME > FADES[0][0]
    # no side signal from the first fade to 7.3 s, then its gain grows by 0.84 per second
    width = np.where(TIME < FADES[0][0], 1, 0.84 * np.maximum(TIME - 7.3, 0))
    mid, side = (dry[0] + dry[1]) / 2, (dry[0] - dry[1]) / 2
    x = (mid + width * side * OPPOSITE) * gain
    # the treble above 4730 Hz is 9.5 dB down while the side signal is off
    dull = after_fade * np.clip(1 - 2 * width, 0, 1) * (1 - nominal_scale(-9.5))
    low = signal.sosfiltfilt(signal.butter(8, 4730, fs=SR, output="sos"), x)
    x = x - dull * (x - low)
    x = cut(x, 11000, "low") + nominal_scale(-95.5) * rng.standard_normal(x.shape)
    return band_limit(x)


dry = scene()
out = record(dry)
unload_audio(out)
```